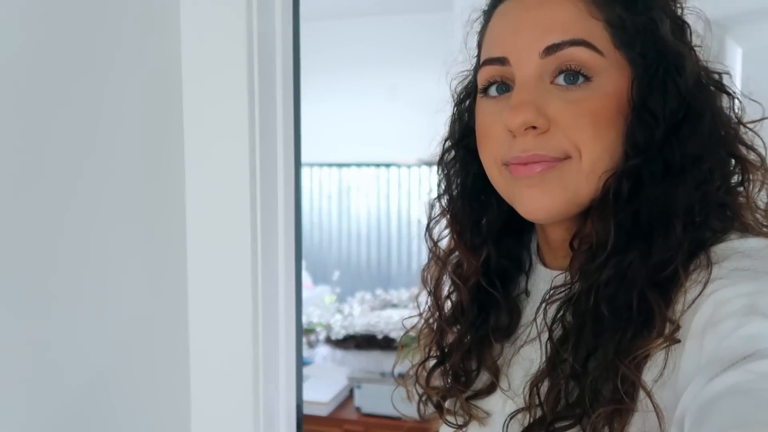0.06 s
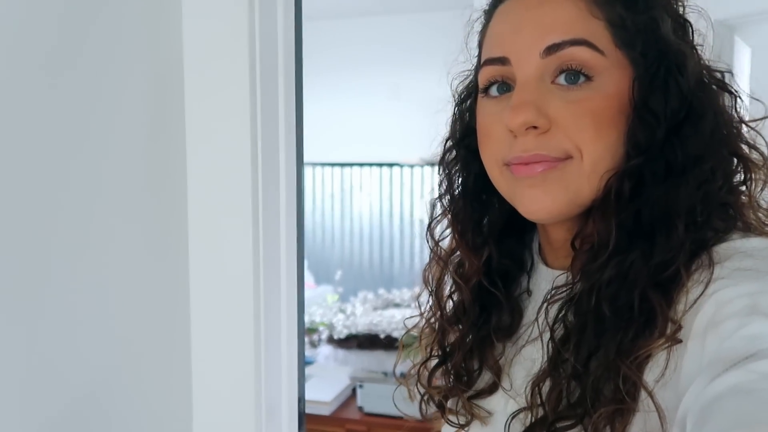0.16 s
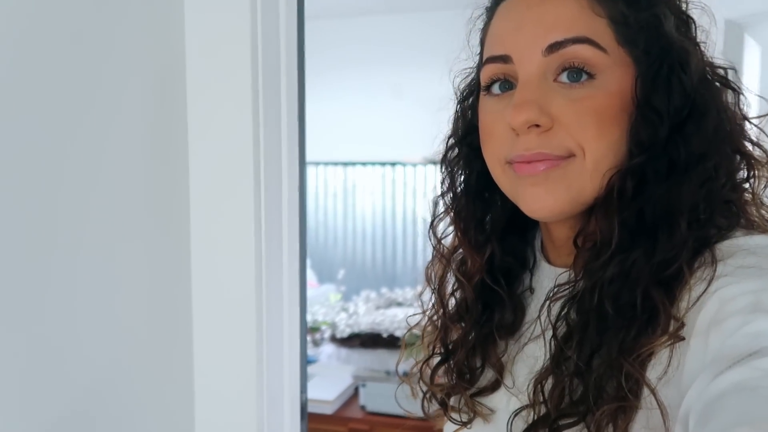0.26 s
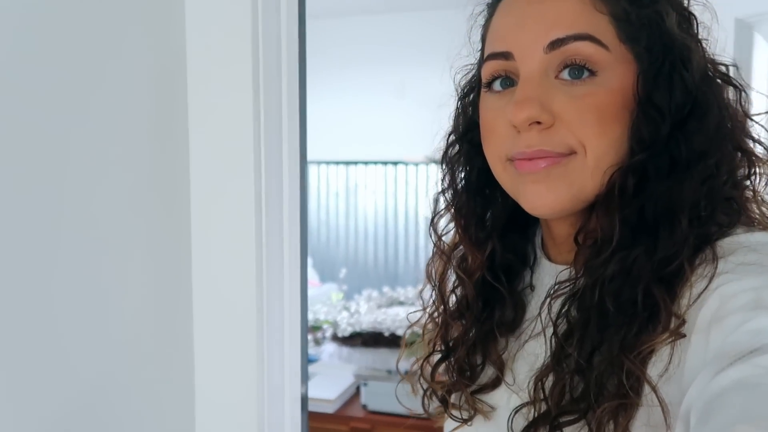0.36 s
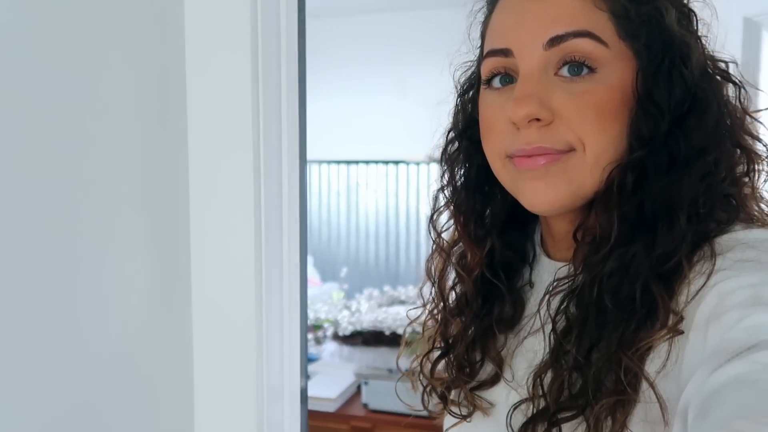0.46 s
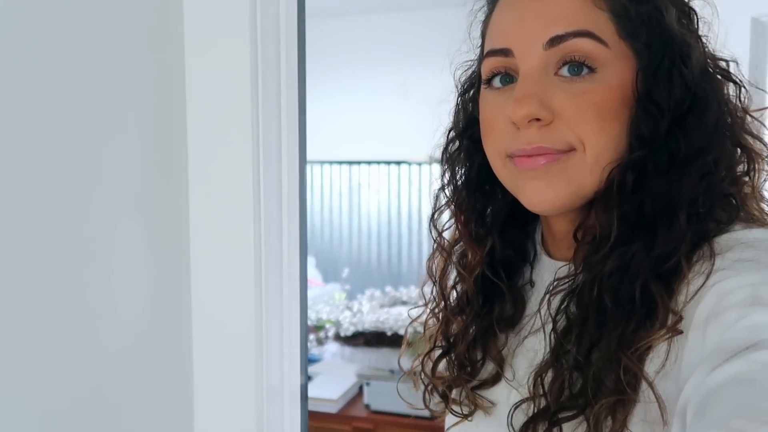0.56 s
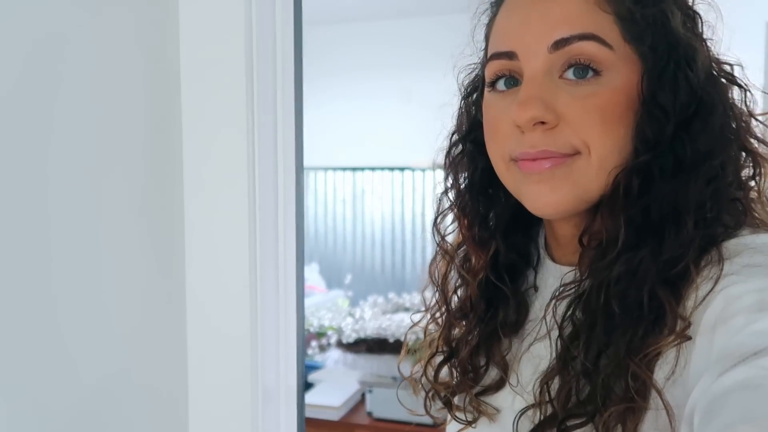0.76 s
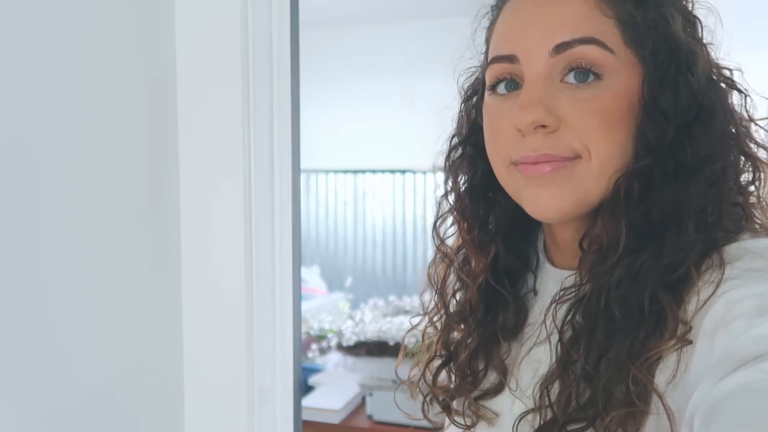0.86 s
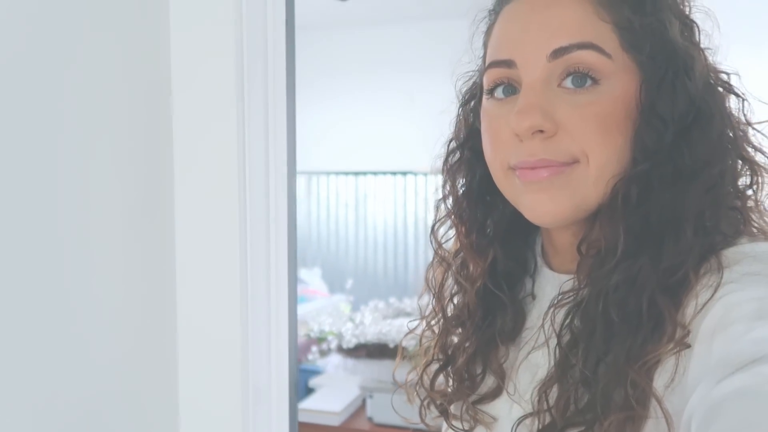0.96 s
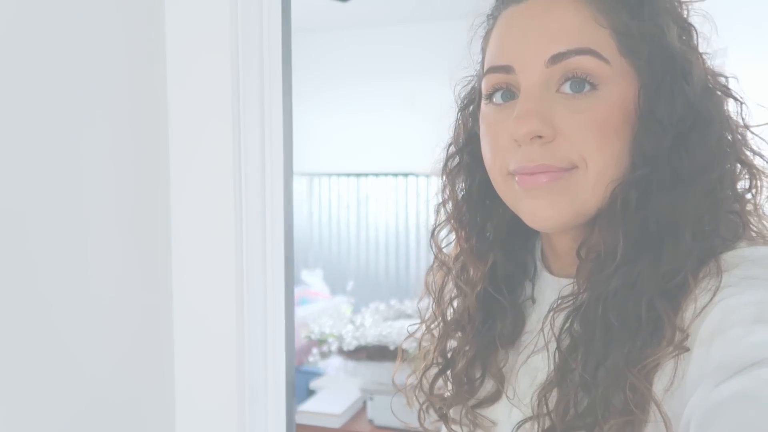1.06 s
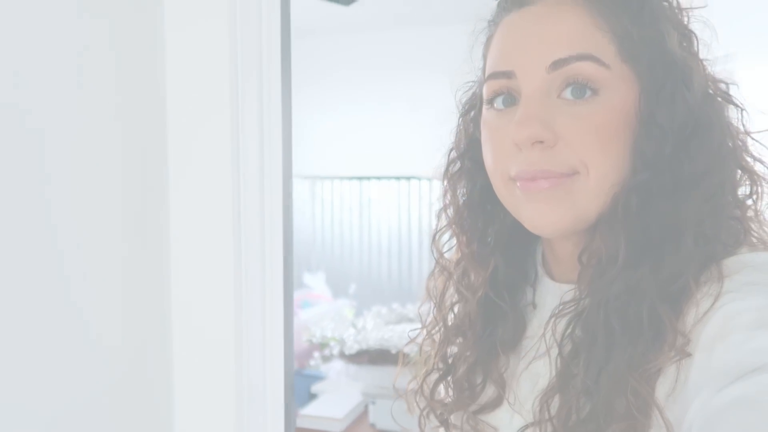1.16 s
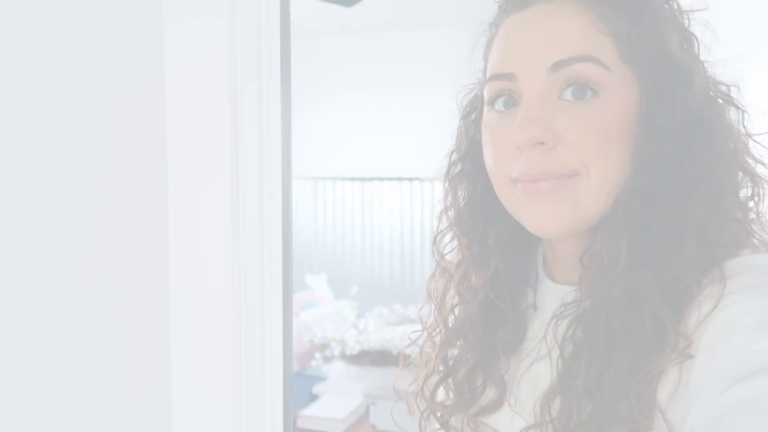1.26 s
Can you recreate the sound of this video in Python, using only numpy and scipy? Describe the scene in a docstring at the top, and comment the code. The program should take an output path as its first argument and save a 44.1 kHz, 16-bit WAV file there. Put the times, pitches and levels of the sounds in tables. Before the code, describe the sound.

A dry door hinge gives a short, high, pure chirp, then a longer squeal that drops roughly and climbs part way back; faint knocks around them, close stereo microphone in a small quiet room.

```python
"""A door on dry hinges opens in a small, quiet room; low rumble and faint hiss (filtered noise) run throughout.
Near 0.2 s a light knock (damped noise), then one pure hinge note swells and sags (sine plus weak octave),
with a low rustle (noise swell) and two more knocks. At 0.43-0.77 s stick-slip squeals: overtones of the
slip rate, shaped by hinge resonances, drop over an octave and climb part way back.
A last knock follows at 0.95 s, a rustle at 1.2 s; walls answer knocks, note and squeal with decaying noise."""
import sys
import numpy as np
from scipy import signal
from scipy.fft import rfft, irfft
from scipy.io import wavfile

SR = 44100
rng = np.random.default_rng(int(sys.argv[2]) if len(sys.argv) > 2 else 0)


def file_out(sig):
    """Save sig as 16-bit WAV at sys.argv[1]."""
    # one column per channel
    cols = np.atleast_2d(sig).T
    # limit, then scale
    lim = np.clip(cols, -1, 1)
    pcm = np.round(lim * 32767).astype(np.int16)
    wavfile.write(sys.argv[1], SR, pcm)


N = 57330
BIN_HZ = np.arange(N // 2 + 1) * SR / N
LEFT_RIGHT_SIGN = np.array([[1], [-1]])  # side signal: added left, subtracted right

# background
FLOOR_DB, FLOOR_WAVER_DB, FLOOR_WAVER_HZ = -46.5, 1.5, 19
# knocks
KNOCK_ATTACK_S = 0.0004
# pure note: peak time, swell widths before and after it, flatness (2 = bell, more = flatter top)
CHIRP_S, CHIRP_RISE_S, CHIRP_FALL_S, CHIRP_SHAPE = 0.2522, 0.018, 0.017, 2.3
CHIRP_HZ, CHIRP_SAG_HZ_PER_S = 3195, 210  # pitch at the peak, fall rate
CHIRP_DB, CHIRP_OCTAVE_DB, CHIRP_ROOM_DB = -16, -20.5, -16  # octave re note, room send
# squeal
TILT_PIVOT_HZ = 2200  # brightness tilts turn about this; knocks use it too
JITTER, JITTER_HZ = 0.11, 1190  # quick pitch spread (fraction, at roughness 1), bandwidth
WAVER, WAVER_HZ = 0.005, 117  # slow pitch spread (fraction), bandwidth
FLUTTER_DB, FLUTTER_HZ = 2.5, 75.6  # level spread of each overtone, bandwidth
SCRAPE_DB, SQUEAL_ROOM_DB = -14.5, -7.5  # scrape at roughness 1, room send
# room
ROOM_T60_S, ROOM_TREBLE_T60_S, ROOM_SPLIT_HZ = 0.48, 0.19, 4480
FIRST_ECHO_S, EARLY_DB, EARLY_DECAY_S = 0.0035, 3, 0.015  # early boost re tail at t = 0
ROOM_SIDE_DB = -19
# recorder
TOP_HZ = 12500


def undb(db):
    """Decibels to gain."""
    return 10 ** (np.asarray(db) / 20)


def unit(x):
    """Scale to rms 1."""
    return x / np.sqrt(np.mean(x ** 2))


def at_hz(points, hz):
    """Interpolate (Hz, dB) points on a log-frequency axis."""
    f, db = np.array(points, float).T
    return np.interp(np.log(np.maximum(hz, 1)), np.log(np.maximum(f, 1)), db)


def colour(x, points, tilt_db_per_oct=0):
    """Filter by (Hz, dB) points plus a tilt, held constant from two octaves below the pivot down."""
    hz = np.maximum(BIN_HZ, 1)
    octaves = np.log2(np.maximum(hz / TILT_PIVOT_HZ, 1 / 4))
    gain = undb(at_hz(points, hz) + tilt_db_per_oct * octaves)
    return irfft(rfft(x) * gain, N)


def walk(bandwidth_hz):
    """Smooth random signal of rms 1: noise under a Gaussian lowpass."""
    lowpass = np.exp(-2 * (BIN_HZ / bandwidth_hz) ** 2)
    return unit(irfft(rfft(rng.standard_normal(N)) * lowpass, N))


def diffuse(points):
    """Coloured noise from all around: independent mid and side, the side weak in the bass."""
    # side re mid: f/Hz, level/dB
    side_points = [(60, -21), (100, -12.5), (180, 0), (310, 1), (530, -1), (910, 0), (1560, -1.5),
                   (2690, -4), (4630, 0), (7980, 0.5)]
    mid = unit(colour(rng.standard_normal(N), points))
    side = unit(colour(rng.standard_normal(N), points))
    return mid + colour(side, side_points) * LEFT_RIGHT_SIGN


def background():
    """Low room rumble and faint hiss: steady noise with a slightly wavering level."""
    # noise spectrum, relative: f/Hz, density/dB
    floor_points = [(20, -8.5), (45, -5.5), (62, 1.5), (90, 0), (150, -6.5), (330, -7), (500, -11),
                    (750, -13), (1400, -17), (2500, -19.5), (3700, -21.5), (5500, -27.5), (8400, -34),
                    (11800, -38.5), (13000, -51)]
    level_db = FLOOR_DB + FLOOR_WAVER_DB * walk(FLOOR_WAVER_HZ)
    return undb(level_db) * diffuse(floor_points)


def rustles(t):
    """Movement of door and opener: bell-shaped swells of low noise."""
    # swells: peak t/s, width (sigma)/s, level/dB
    swells = [(0.261, 0.11, -46), (1.2, 0.19, -50.5)]
    # noise spectrum, relative: f/Hz, density/dB
    rustle_points = [(30, -11), (70, -0.5), (120, -2), (300, -4), (500, -6.5), (800, -19), (1400, -16),
                     (3000, -24), (6000, -33.5), (12000, -44.5)]
    envelope = sum(undb(db) * np.exp(-0.5 * ((t - peak) / width) ** 2) for peak, width, db in swells)
    return envelope * diffuse(rustle_points)


def door_knocks(t):
    """Light knocks as heavily damped noise bursts; returns direct sound and room send."""
    # knocks: t/s, level/dB, decay (to 1/e)/s, tilt/(dB/octave), room send/dB
    knocks = [(0.191, -46.5, 0.016, -1.5, -18), (0.267, -47.5, 0.0084, 4.5, 4.5),
              (0.3567, -35, 0.02, -4, -1.5), (0.9454, -29, 0.0038, 5.5, -4.5)]
    # knock spectrum: f/Hz, level/dB
    knock_points = [(100, -9), (600, -16.5), (1200, -2), (1800, 0), (2600, -2.5), (3600, -7.5), (4600, -22),
                    (6500, -15), (9000, -32), (14000, -29)]
    direct, sent = 0, 0
    for start, db, decay, tilt, room_db in knocks:
        age = np.maximum(t - start, 0)
        envelope = (1 - np.exp(-age / KNOCK_ATTACK_S)) * np.exp(-age / decay)
        noise = unit(colour(rng.standard_normal(N), knock_points, tilt))
        knock = undb(db) * envelope * noise
        direct = direct + knock
        sent = sent + undb(room_db) * knock
    return direct, sent


def hinge_chirp(t):
    """Friction swells one hinge resonance: a sagging sine with a weak octave."""
    age = t - CHIRP_S
    width = np.where(age < 0, CHIRP_RISE_S, CHIRP_FALL_S)
    swell = np.exp(-0.5 * np.abs(age / width) ** CHIRP_SHAPE)
    phase = 2 * np.pi * np.cumsum(CHIRP_HZ - CHIRP_SAG_HZ_PER_S * age) / SR
    tone = np.sin(phase) + undb(CHIRP_OCTAVE_DB) * np.sin(2 * phase)
    return np.sqrt(2) * undb(CHIRP_DB) * swell * tone


def hinge_squeal(t, count=13):
    """Uneven stick-slip: overtones glide through the hinge's resonances; noise scrapes at the slip rate."""
    # slip course: t/s, slip rate f/Hz, drive level/dB, tilt/(dB/octave), roughness (0-1)
    slip_course = [(.433, 1990, -62, -16.5, 0.1), (0.448, 1936, -32, -6.5, 0.1),
                   (0.464, 1871, -26.5, 3.5, 0.1), (.476, 1706, -32.5, 2, .15),
                   (.481, 1329, -24, 1.5, 0.91), (.488, 913.7, -27.5, 2.5, 0.6),
                   (.496, 826, -25.5, 1, 0.45), (.504, 803.8, -24.5, 1, 0.3), (.52, 876.8, -27.5, 0, .2),
                   (0.541, 931.7, -26, 0.5, 0.22), (0.56, 949, -36, 2, 0.5), (.574, 981, -28.5, 3, .25),
                   (0.597, 1065, -29.5, 4.5, 0.2), (0.615, 1064, -29.5, 4, .15),
                   (0.626, 1104, -31.5, -0.5, .35), (.65, 1130, -28.5, -2.5, 0.06),
                   (0.675, 1204, -31, -6.5, 0.1), (.692, 1176, -29, -6.5, 0.25), (.712, 1231, -32, -2, 0),
                   (.737, 1303, -36.5, -9, .2), (0.751, 1332, -48, -7, 0), (.77, 1275, -75, -8, .2)]
    # radiation by hinge and door: f/Hz, level/dB
    radiation = [(700, -37.5), (830, -21.5), (940, -12), (1060, -2.5), (1200, -5.5), (1700, 3),
                 (2100, -5.5), (2600, -4.5), (3200, -4), (3700, 1), (4200, -4.5), (5100, -1), (5700, -12.5),
                 (6400, -15.5), (7600, -18.5), (8200, -26.5), (11000, -73), (14000, -81)]
    times, *columns = np.array(slip_course).T
    hz, db, tilt, rough = (np.interp(t, times, c) for c in columns)
    unevenness = JITTER * rough ** 2 * walk(JITTER_HZ) + WAVER * walk(WAVER_HZ)
    phase = 2 * np.pi * np.cumsum(hz * (1 + unevenness)) / SR

    tone = 0
    for k in range(1, count + 1):
        gain_db = at_hz(radiation, k * hz) + tilt * np.log2(k * hz / TILT_PIVOT_HZ)
        gain_db = gain_db + FLUTTER_DB * walk(FLUTTER_HZ)
        audible = k * hz < SR / 2  # no aliasing
        tone = tone + undb(gain_db) * audible * np.sin(k * phase + rng.uniform(0, 2 * np.pi))

    scrape = unit(colour(rng.standard_normal(N) * (1 + np.cos(phase)), radiation))
    active = (t > times[0]) * (t < times[-1])
    return undb(db) * active * (np.sqrt(2) * tone + undb(SCRAPE_DB) * rough ** 2 * scrape)


def ring(x):
    """Pin and leaves ring on after an overtone sweeps by: parallel one-pole complex resonators."""
    # modes: f/Hz, t60/s, level/dB
    modes = [(1730, 0.1, -13), (2638, 0.016, 0.5), (3224, .045, 1.5), (3640, 0.049, -8), (5010, 0.018, -13)]
    out = x
    for hz, t60, db in modes:
        pole = np.exp((2j * np.pi * hz - np.log(1000) / t60) / SR)
        peak_norm = 2 * (1 - abs(pole))  # about unity gain at resonance
        out = out + undb(db) * peak_norm * signal.lfilter([1], [1, -pole], x).real
    return out


def room(x, t):
    """Dense reflections as decaying noise, boosted early, treble dying sooner; nearly mono."""
    def band(kind):
        sos = signal.butter(2, ROOM_SPLIT_HZ, kind, fs=SR, output="sos")
        return signal.sosfilt(sos, rng.standard_normal((2, N)))

    def fade(t60):
        return np.exp(-np.log(1000) * t / t60)

    echoes = band("low") * fade(ROOM_T60_S) + band("high") * fade(ROOM_TREBLE_T60_S)
    echoes = echoes * (t > FIRST_ECHO_S)
    echoes = echoes * (1 + undb(EARLY_DB) * np.exp(-t / EARLY_DECAY_S))
    response = unit(echoes) / np.sqrt(N)  # mean energy 1 per channel
    mid, side = signal.fftconvolve(x[None], response, axes=1)[:, :N]
    return mid + undb(ROOM_SIDE_DB) * side * LEFT_RIGHT_SIGN


def microphone(pair):
    """Two ports: phase and level differ by frequency, split evenly; the right leads in the treble."""
    # right re left: f/Hz, phase lead/rad, level/dB
    ports = [(300, -1.5, -2), (1300, 0, .3), (2000, 0.38, 1.8), (3200, 0.52, 1.5), (3700, 1, 1.1),
             (4400, 1.65, 3), (5400, 1.39, 2.3), (6500, 1.94, 2), (8000, 2.5, 0)]
    hz, lead_rad, louder_db = np.array(ports).T
    half_gain = undb(np.interp(BIN_HZ, hz, louder_db) / 2)
    half = half_gain * np.exp(1j * np.interp(BIN_HZ, hz, lead_rad) / 2)
    return irfft(rfft(pair) * np.array([1 / half, half]), N)


def scene():
    """Hinge, door and reflections through the ports, plus rustles and background."""
    t = np.arange(N) / SR
    knocks, knocks_sent = door_knocks(t)
    chirp = hinge_chirp(t)
    squeal = ring(hinge_squeal(t))
    room_send = undb(CHIRP_ROOM_DB) * chirp + undb(SQUEAL_ROOM_DB) * squeal + knocks_sent
    reflections = room(room_send, t)
    return microphone(chirp + squeal + knocks + reflections) + rustles(t) + background()


def record(dry):
    """The recorder cuts the top: steep elliptic lowpass."""
    # order 8, 0.2 dB ripple, 70 dB stopband
    return signal.sosfilt(signal.ellip(8, 0.2, 70, TOP_HZ, fs=SR, output="sos"), dry)


dry = scene()
out = record(dry)
file_out(out)
```